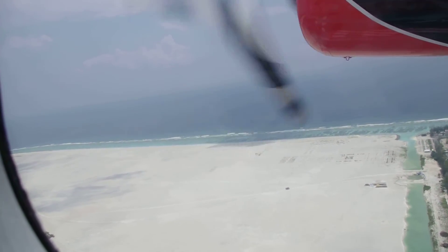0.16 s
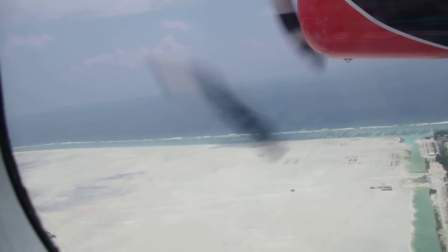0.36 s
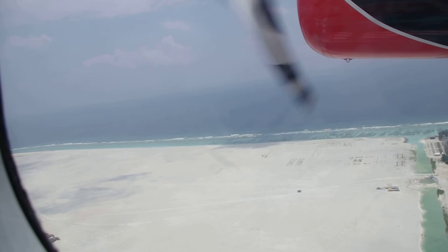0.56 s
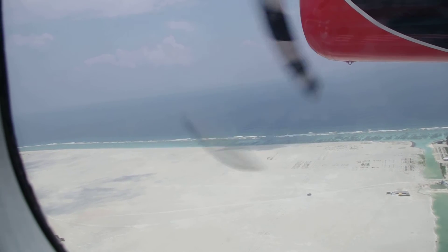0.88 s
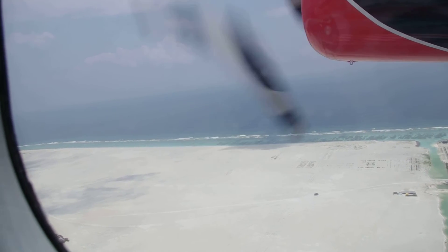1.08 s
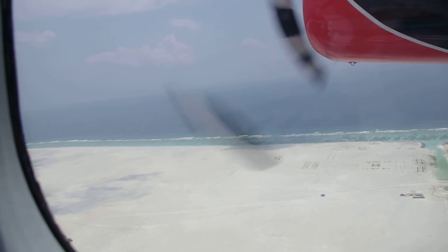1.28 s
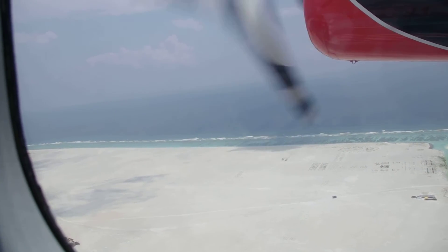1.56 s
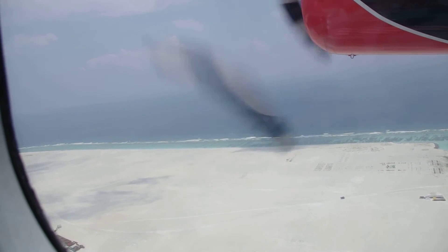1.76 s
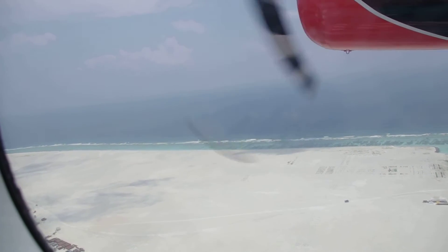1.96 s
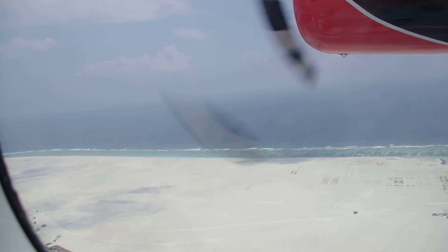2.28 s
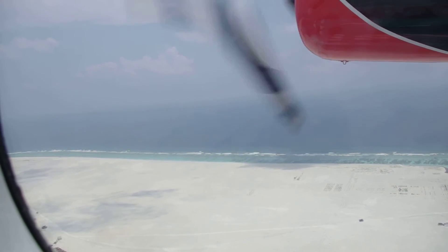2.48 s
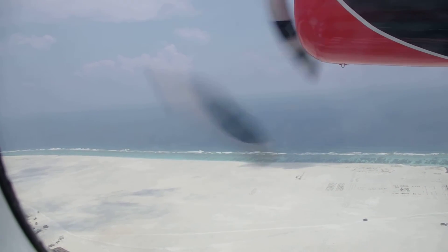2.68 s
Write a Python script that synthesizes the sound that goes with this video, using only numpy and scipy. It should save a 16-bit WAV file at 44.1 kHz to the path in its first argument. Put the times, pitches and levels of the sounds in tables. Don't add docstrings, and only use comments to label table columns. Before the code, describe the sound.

Inside a small propeller plane, a continuous low engine hum throbs under broad wind roar and hiss. Fast light ticks flutter at the window, and the airy noise swells midway, easing slightly at the end.

```python
import sys
import numpy as np
from scipy import signal
from scipy.fft import rfft, irfft, next_fast_len
from scipy.io import wavfile
from scipy.ndimage import uniform_filter1d, map_coordinates

SR = 44100
rng = np.random.default_rng(int(sys.argv[2]) if len(sys.argv) > 2 else 0)


def to_wav(sig):
    pcm = np.clip(np.atleast_2d(sig), -1, 1) * 32767
    pcm = np.round(pcm).astype(np.int16)
    wavfile.write(sys.argv[1], SR, pcm.T)


def gain_from_db(level_db):
    decades = np.asarray(level_db, float) / 20
    return 10 ** decades


N = 125244
BLADES = 3


def unit(x):
    return x / np.sqrt(np.mean(x ** 2) + 1e-20)


def wobble(rate):
    knots = rng.standard_normal(int(N * rate / SR) + 4)
    return map_coordinates(knots, [np.arange(N) * rate / SR])


def filtered(x, response):
    m = next_fast_len(N + 8192)
    return irfft(rfft(x, m) * response(np.fft.rfftfreq(m, 1 / SR)), m)[:N]


def tone(level_db, phase):
    return np.sqrt(2) * gain_from_db(level_db) * np.cos(phase)


# t/s, level/dB
EXPOSURE = [
    (0, -55.8),
    (.6, -55.9),
    (1.0, -55.3),
    (1.3, -53.4),
    (1.6, -52),
    (1.85, -51),
    (2.1, -50.1),
    (2.35, -50.2),
    (2.64, -50.8),
    (2.84, -52.3),
]


def exposure_db():
    s, db = np.transpose(EXPOSURE)
    level = np.interp(np.arange(N) / SR, s, db)
    return level - level.mean()


def shaft(blade_hz, lag_s):
    blade_cycles = np.cumsum(blade_hz * np.ones(N)) / SR - np.mean(blade_hz) * lag_s
    return 2 * np.pi / BLADES * blade_cycles + 0.03 / BLADES * wobble(6)


# t/s, f/Hz
NEAR_SPEED = [
    (0, 87.1),
    (1.1, 87.07),
    (1.4, 87.2),
    (1.65, 87.1),
    (1.95, 86.95),
    (2.25, 87.1),
    (2.84, 87.25),
]


def near_shaft():
    blade_hz = np.interp(np.arange(N) / SR, *np.transpose(NEAR_SPEED))
    return shaft(blade_hz, lag_s=.0014)


def far_shaft():
    return shaft(86.95, lag_s=-.00165)


def propeller(turn, orders, skew_rad, gain_db):
    total = 0
    for order, db in orders:
        sway_db = (.05 + .08 * order) * wobble(5.68)
        level_db = db + (order - BLADES) * gain_db + sway_db
        total = total + tone(level_db, order * turn + skew_rad)
    return total


# multiple of shaft rate, level/dB rms
NEAR_ORDERS = [(2, -68), (3, -33.2), (4, -53.5), (5, -53), (6, -54), (8, -55), (9, -36), (10, -55),
               (12, -50), (15, -56), (18, -62)]


def near_propeller(turn, open_db):
    return propeller(turn, NEAR_ORDERS, skew_rad=.75, gain_db=.1 * open_db)


# multiple of shaft rate, level/dB rms
FAR_ORDERS = [
    (3, -60),
    (6, -33),
    (9, -44.5),
    (11, -58),
    (12, -56),
    (15, -60),
]


def far_propeller(turn, open_db):
    return propeller(turn, FAR_ORDERS, skew_rad=2.5, gain_db=.05 * open_db)


def rush(spectrum, patchy_db):
    z = signal.stft(rng.standard_normal(N + 512), nperseg=512)[2]
    field = uniform_filter1d(rng.standard_normal(z.shape), 6, 0)
    field = uniform_filter1d(field, 4, 1)
    x = signal.istft(z * gain_from_db(patchy_db * unit(field)), nperseg=512)[1][:N]
    f, db = np.transpose(spectrum)

    def response(hz):
        return gain_from_db(np.interp(np.log(hz + 1), np.log(f + 1), db, -120, -120))

    return unit(filtered(x, response))


# f/Hz, level/dB per Hz
ROAR = [(15, -70), (30, -40), (52, -26), (90, -14), (140, -9.5), (200, -4), (300, -4.5), (370, -7.5),
        (1200, -23.5), (1800, -50)]
HISS = [(530, -2), (900, -5), (1680, -8.5), (2180, -11.5), (2470, -13), (2670, -13), (6180, -22),
        (9000, -25), (11700, -40), (19800, -120)]
FIZZ = [(7000, -16), (9000, -12), (10600, -4.5), (11500, -0.5), (12600, 3), (13600, -4), (15000, -14),
        (15700, -26)]


def slipstream(turn, open_db):
    beat = np.sin(BLADES * turn)
    gust_db = .5 * wobble(45)
    roar_db = -39.5 + .95 * open_db + gust_db
    hiss_db = -48.5 + open_db + gust_db + 0.36 * wobble(60)
    fizz_db = -54 + 1.05 * open_db + gust_db + 0.27 * wobble(39.8)
    roar = gain_from_db(roar_db) * (1 + 0.041 * beat) * rush(ROAR, patchy_db=0.6)
    hiss = gain_from_db(hiss_db) * (1 + 0.076 * beat) * rush(HISS, patchy_db=0.47)
    fizz = gain_from_db(fizz_db) * (1 - 0.055 * beat) * rush(FIZZ, patchy_db=0.6)
    return roar + hiss + fizz


# f/Hz, width/Hz, level/dB
TRIM = [(230, 25, 2), (372, 30, -4), (415, 30, 3), (640, 40, -3), (820, 100, 3), (960, 50, 5),
        (1030, 60, -4), (1200, 80, 2), (1400, 150, 2), (1650, 150, 3), (1850, 80, -3), (2250, 150, -2),
        (2450, 150, 3)]


def trim(x):
    def response(f):
        return gain_from_db(sum(db / (1 + ((f - hz) / (width / 2)) ** 2) for hz, width, db in TRIM))

    return filtered(x, response)


# t/s, level/dB
STRAYS = [
    (.3378, -28),
    (.5795, -30),
    (.6716, -30),
    (.9242, -30),
    (.947, -30),
    (2.1, -27),
    (2.2735, -27),
    (2.388, -27),
    (2.6095, -28),
]


def window_slaps():
    slap_hz, rise_s, recover_s = 87.0, .000025, .0003
    count = int(N / SR * slap_hz)
    luck = rng.standard_normal((count, 3))
    s = .00465 + np.arange(count) / slap_hz + 0.00011 * luck[:, 0]
    lead = np.arange(count) % BLADES == 0
    lead_db = 1.3 * luck[:, 1] - 5 * np.maximum(s - 1.2, 0)
    other_db = -12 + 4 * luck[:, 1]
    db = -28 + np.where(lead, lead_db, other_db)
    early_s = s - .00042
    early_db = db - 5 + 4 * np.clip(luck[:, 2], -3, 1)
    stray_s, stray_db = np.transpose(STRAYS)
    when = np.concatenate([s, early_s, stray_s])
    size = gain_from_db(np.concatenate([db, early_db, stray_db]))
    hits = np.bincount(np.round(when * SR).astype(int), size * recover_s * SR, N)[:N]

    def response(f):
        highpass = 1j * f / (250 + 1j * f)
        recovery = 1 + 2j * np.pi * f * recover_s
        rise = (1 + 2j * np.pi * f * rise_s) ** 2
        return highpass / recovery / rise

    return filtered(-hits, response)


# offset in shaft turns, level/dB rms
WHINE_LINES = [(-9, -82), (-6, -80), (-5, -79), (0, -66), (2, -73), (3, -69), (5, -75), (6, -73), (7, -75),
               (8, -71), (11, -76), (12, -76), (14, -75), (23, -81)]


def compressor(turn, open_db):
    intake_hz, width_hz = 9625, 580
    carrier = 2 * np.pi * 9452 * np.arange(N) / SR + .5 * wobble(6)
    lines = 0
    for offset, db in WHINE_LINES:
        phase = carrier + offset * turn + 0.59 * wobble(9.8) + rng.uniform(0, 2 * np.pi)
        lines = lines + tone(db + 1.5 * wobble(9), phase)

    def resonance(f):
        damping = 1j * f * width_hz
        return (damping / (intake_hz ** 2 - f * f + damping)) ** 1.6

    air = unit(filtered(rng.standard_normal(N), resonance)) * gain_from_db(-59.5 + 1.9 * wobble(25.65))
    chopped_air = (1 + 0.1 * np.cos(BLADES * turn)) * air
    return gain_from_db(1.1 * open_db) * lines + gain_from_db(1.07 * open_db) * chopped_air


# f/Hz, level/dB rms
GEAR_LINES = [
    (1798.8, -68),
    (2469.1, -71),
]


def gearbox(open_db):
    t = np.arange(N) / SR
    total = 0
    for hz, db in GEAR_LINES:
        level_db = db + .5 * open_db + 1.1 * wobble(3.8)
        total = total + tone(level_db, 2 * np.pi * hz * t + .5 * wobble(4))
    return total


def scene():
    open_db = exposure_db()
    near, far = near_shaft(), far_shaft()
    drone = near_propeller(near, open_db) + far_propeller(far, open_db)
    air = trim(slipstream(near, open_db))
    engine = compressor(near, open_db) + gearbox(open_db)
    return (drone + air + window_slaps() + engine)[None]


def roll_off(x):
    return signal.sosfilt(signal.butter(12, 15640, fs=SR, output="sos"), x)


def record(dry):
    return roll_off(dry)


dry = scene()
out = record(dry)
to_wav(out)
```